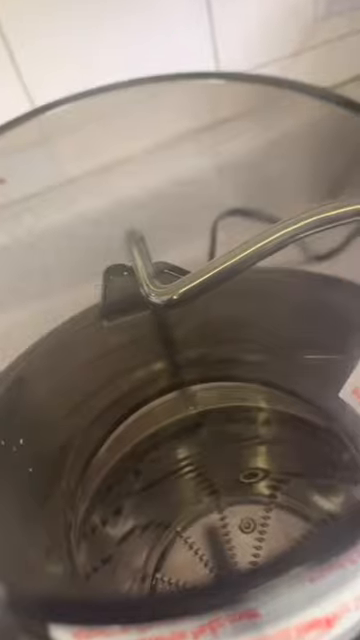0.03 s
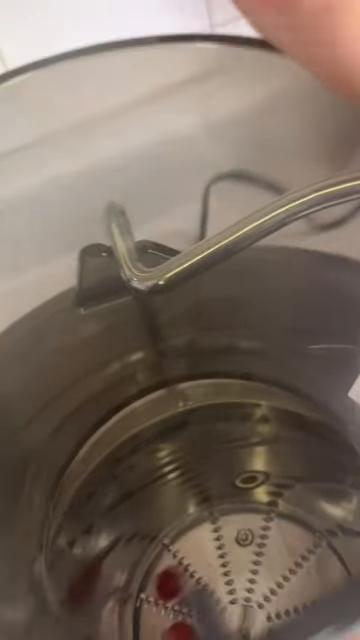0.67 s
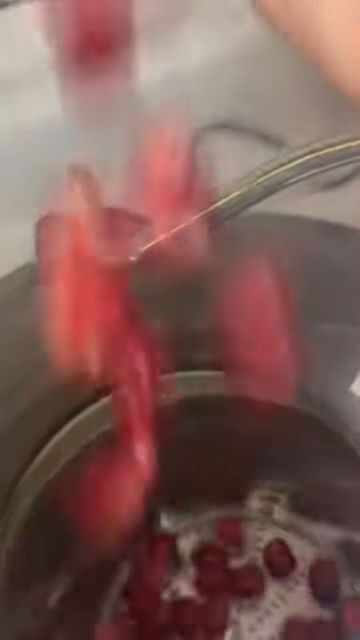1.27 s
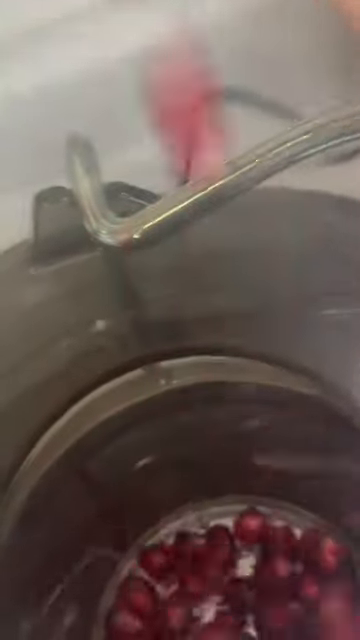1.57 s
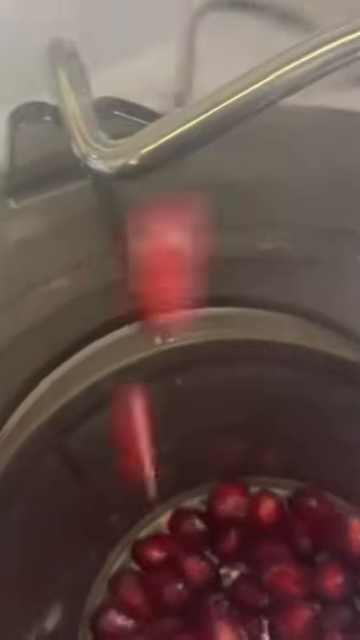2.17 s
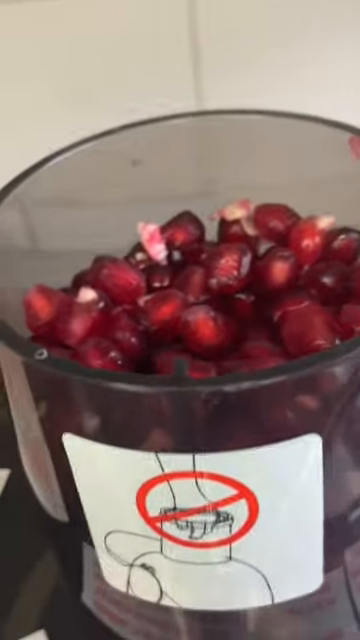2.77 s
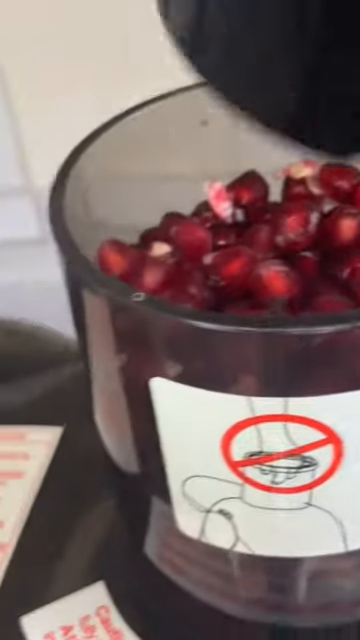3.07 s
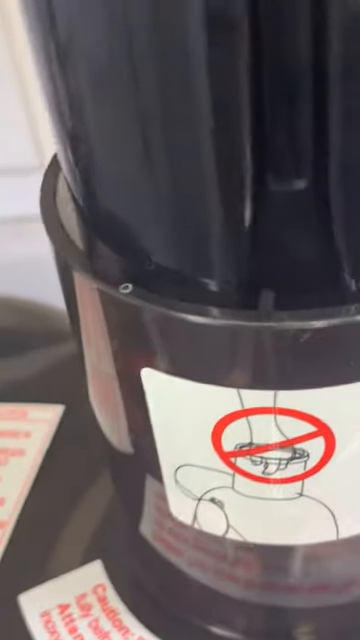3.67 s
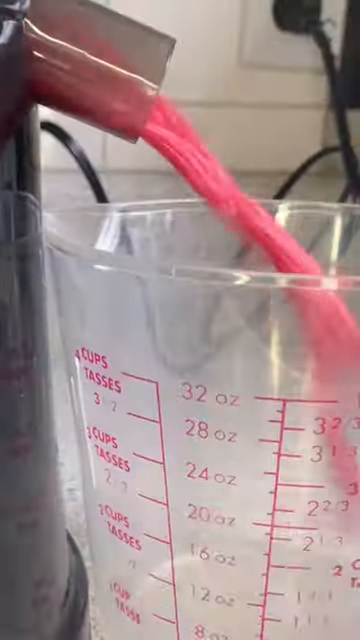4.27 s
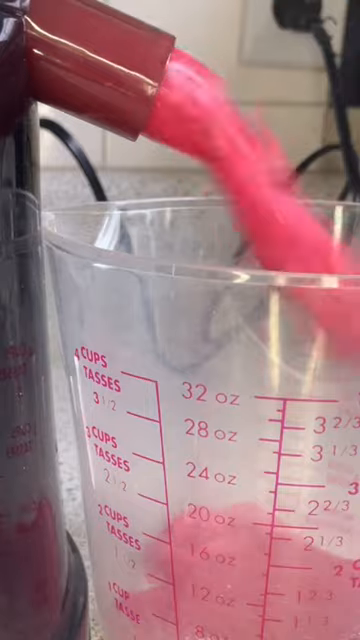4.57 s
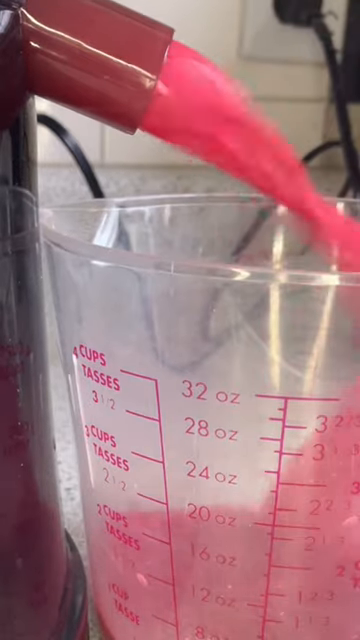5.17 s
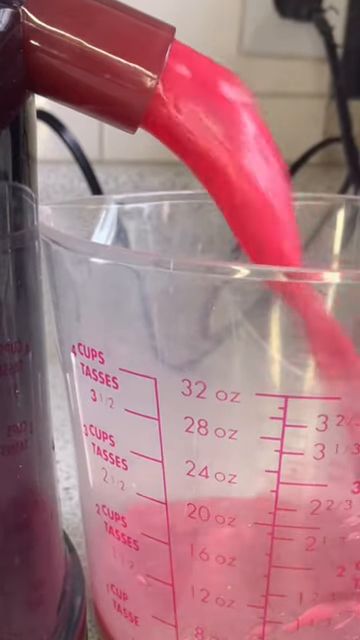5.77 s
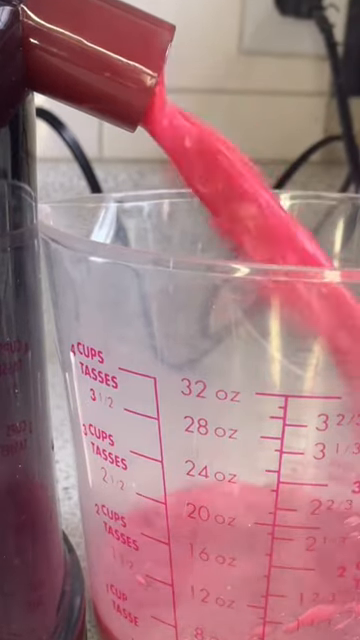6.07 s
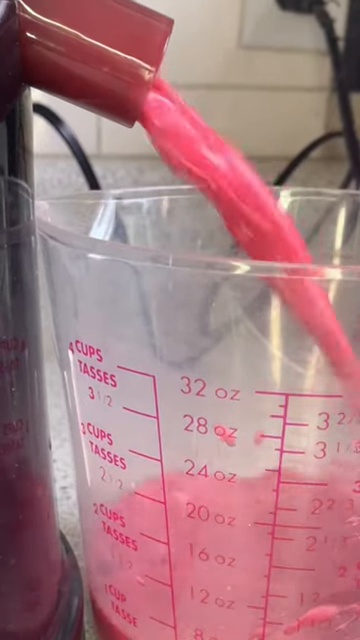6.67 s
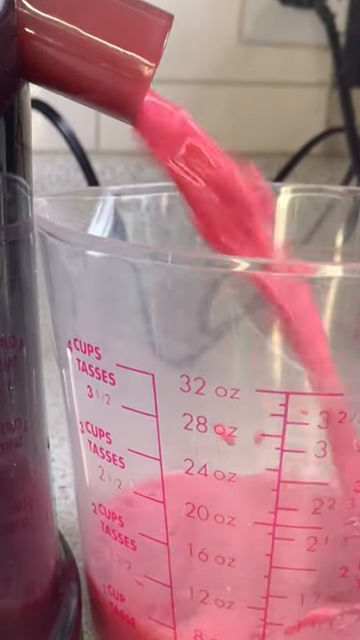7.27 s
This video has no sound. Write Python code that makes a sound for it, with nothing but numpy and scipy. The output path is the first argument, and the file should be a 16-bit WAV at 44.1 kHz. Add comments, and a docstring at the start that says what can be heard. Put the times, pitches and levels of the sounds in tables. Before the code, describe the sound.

Pomegranate seeds patter into a plastic chute, a pusher knocks, then an electric juicer shreds them with a roar and whines down as juice bubbles.

```python
"""Pomegranate seeds patter into a centrifugal juicer, each ringing the plastic chute with a wet tick.
The pusher knocks into place and slides down. Teeth shred the seeds with a roar over churning pulp.
The load clears, the motor speeds up, is switched off and coasts down, slots and commutator whining.
Air rushes through the basket, loose bits rattle in the bowl and juice bubbles into a jug.
The tiles of a small, quiet kitchen add short reflections."""
import sys
import numpy as np
from scipy import signal
from scipy.fft import rfft, irfft, next_fast_len
from scipy.io import wavfile
from scipy.ndimage import uniform_filter1d

SR = 44100
rng = np.random.default_rng(int(sys.argv[2]) if len(sys.argv) > 2 else 0)


def materialize(psi):
    """Save the field psi as 16-bit PCM at rate SR to the path in sys.argv[1].

    A 1-D psi becomes a single channel; in a 2-D psi each row is a channel.
    """
    bounded = np.clip(np.atleast_2d(psi).T, -1, 1)
    quanta = np.round(bounded * 32767).astype(np.int16)
    wavfile.write(sys.argv[1], SR, quanta)


N = 327222
TIME = np.arange(N) / SR

# big seeds cracking on the teeth: time_s, level_db
BIG_CRACKS = [(4.2537, -9), (4.2941, -25), (4.3081, -7.5), (4.315, -6), (4.3695, -8), (4.3948, -17),
              (4.4245, -7), (4.4458, -8.5), (4.4822, -10), (4.498, -6), (4.532, -8.5), (4.566, -6.5),
              (4.6275, -7.5), (4.7507, -9), (4.784, -9), (4.8917, -8.5)]
# teeth grating: freq_hz, gain_db
GRATE_SPECTRUM = [(300, -14), (600, -9), (950, 2), (1250, -1), (1800, -3), (2300, 0), (3800, -3),
                  (5000, -0.5), (7000, -3), (11000, 0.5), (15500, -7)]
# steel basket resonances: freq_hz, half_width_hz, gain_db
BASKET_MODES = [(1042, 66, -3.5), (2340, 230, -9.5), (3130, 385, 3), (4530, 71, 1.5)]
# churning pulp: freq_hz, gain_db
PULP_SPECTRUM = [(25, -34), (55, -7), (110, -3.5), (155, -5.5), (220, 3), (310, -5), (380, 3), (550, -1.5),
                 (850, -4.5), (1300, -14.5), (2500, -16), (5000, -39)]

# mains buzz: mains_multiple, level_db
BUZZ_HARMONICS = [(1, -51), (2, -39), (3, -53), (4, -43), (5, -54), (6, -48), (7, -59), (8, -52)]
# shaft imbalance and fan: shaft_multiple, level_db
SHAFT_HARMONICS = [(1, -49), (2, -54), (3, -52.5), (11, -62), (18, -77), (24, -62.5)]
# base and counter radiating the shaft hum: freq_hz, gain_db
BASE_RESPONSE = [(80, -2), (125, -3), (165, -34), (205, -3), (245, -2), (295, 3), (325, -4.5), (380, -32),
                 (700, 5), (1050, -1), (1350, -3), (1700, -17), (2250, 4), (2500, -7), (3000, 3)]
# armature slot tones: slot_rate_multiple, level_db
SLOT_HARMONICS = [(2, -15), (3, 1), (4, 2), (5, -16), (6, -2), (7, -15), (8, -2.5), (9, -17), (10, -6.5),
                  (11, -24), (12, -6), (13, -10), (14, -4), (16, -13)]
# housing radiating the whine: freq_hz, gain_db
HOUSING_RESPONSE = [(3000, -16), (3900, -8.5), (4600, -4), (5300, -8.5), (5750, -3.5), (6050, 15.5),
                    (6450, 4), (7100, 2.5), (8000, -6), (9300, 3), (10400, 9), (11500, 16), (12400, 13.5),
                    (13200, -1), (14600, -11), (15500, -9)]
# motor whine: time_s, gain_db
WHINE_ENVELOPE = [(5.1, -68), (5.3, -54), (5.62, -55.5), (6, -52.5), (6.7, -55.5), (7.2, -52.5),
                  (7.42, -55.5)]

# seeds landing one by one: start_s, wall_db, thud_db, tick_db
SEED_HITS = [(0.6544, -42.5, -37.5, -49), (0.7023, -33, -36, -43.5), (0.7587, -40, -38.5, -61),
             (0.8195, -39, -43, -69), (0.844, -35, -40.5, -52.5), (0.8964, -17.5, -25.5, -40),
             (0.9024, -27.5, -28.5, -46), (0.9144, -43, -40, -58), (0.9435, -36, -41, -42.5),
             (0.9564, -35, -33.5, -54), (0.9752, -20.5, -32.5, -35.5), (0.9974, -29, -29, -63),
             (1.0086, -25, -35, -39.5), (1.056, -34, -33, -49), (1.0799, -20, -40, -52),
             (1.0944, -34, -31, -40), (1.1179, -23, -32, -60), (1.1314, -36, -42, -40),
             (1.1443, -25.5, -31, -50), (1.1725, -23, -30.5, -36), (1.1915, -35, -33, -42),
             (1.2037, -29, -37, -50), (1.2194, -29, -32, -51), (1.2446, -40, -29.5, -58),
             (1.264, -41, -36, -43.5), (1.2775, -41, -37, -43), (1.288, -27, -32.5, -55),
             (1.3024, -53, -47, -70), (1.3259, -43, -37, -41.5), (1.3423, -31, -29, -50),
             (1.3694, -37, -36, -39), (1.3902, -24, -32, -44), (1.4122, -39, -33.5, -44),
             (1.4294, -31, -32.5, -40), (1.4476, -24, -30.5, -49), (1.4564, -28, -34, -42.5),
             (1.476, -29, -35, -44), (1.5419, -28, -47, -50), (1.5524, -35, -33, -38.5),
             (1.5644, -38, -32.5, -43), (1.5828, -36, -29.5, -46), (1.5934, -32, -30.5, -43),
             (1.6417, -25.5, -31.5, -42.5), (1.7015, -40, -42, -44.5), (1.7205, -32, -30, -52),
             (1.7695, -40, -33, -50), (1.8672, -35, -31, -52.5), (1.9634, -29.5, -37, -56),
             (1.9864, -36, -34, -50.5), (2.2524, -57, -35.5, -59)]
# six hollow chute modes, then nine of wall and basket: freq_hz, gain_db, t60_s
CHUTE_MODES = [(181, -6.5, 0.05), (418.4, -4.5, .09), (449, -6.5, 0.086), (540, -22, 0.13),
               (662.6, -1.5, 0.096), (766, -14.5, 0.044), (848, -15, 0.036), (1080, -6.5, 0.023),
               (1336, -8.5, 0.025), (1477, -13, 0.024), (1716, -5, 0.018), (2450, -15, 0.0095),
               (3080, -9.5, 0.0084), (4200, -15.5, 0.019), (6800, -12, .0044)]
# snap of a seed's skin: freq_hz, gain_db
TICK_SPECTRUM = [(300, -34), (1500, -18), (2500, 10), (5500, 4), (6800, 8), (8200, 5), (11000, 9.5),
                 (15500, 5)]

# plastic parts knocking: start_s, boom_db, clunk_db, clack_db, snap_db
KNOCK_HITS = [(2.152, -56, -61, -40, -20), (2.87, -84, -77, -57, -46), (3.155, -20.5, -8, -40, -24.5),
              (3.264, -38, -34, -39.5, -42.5), (3.283, -56, -56, -39.5, -38.5),
              (3.2891, -39, -40, -33.5, -15.5), (3.2907, -20.5, -17, -17, -16.5),
              (3.487, -37, -43, -37.5, -40.5), (3.711, -75, -77, -65, -42.5), (3.72, -72, -72, -60, -45),
              (3.804, -71, -74, -53, -36)]
# boom of the base: freq_hz, gain_db, t60_s
BOOM_MODES = [(58, -8.5, .09), (110, 3, 0.066), (227.5, -1, .066), (363, -2.5, .065)]
# pusher on the chute rim: freq_hz, gain_db, t60_s
CLUNK_MODES = [(454, -12.5, 0.045), (546, 8, 0.0087), (610, -16.5, 0.077)]
# clack of the feed tube: freq_hz, gain_db, t60_s
CLACK_MODES = [(1025, -7.5, 0.054), (1210, -7, 0.023), (1567, 2, 0.047), (1680, -6, 0.017),
               (2335, -5, 0.022), (2830, -10, .03), (2860, -6, 0.034), (4520, -11, .014), (4920, -10, .01),
               (6470, -11, 0.011), (7000, -15.5, 0.012)]
# sharp edge of a knock: freq_hz, gain_db
SNAP_SPECTRUM = [(300, -2), (1200, -18.5), (3000, 2.5), (4800, -5), (6000, -5.5), (7200, -8), (9500, -8),
                 (12500, -12.5), (15500, -24)]
# loose parts after a knock: freq_hz, gain_db
CHATTER_SPECTRUM = [(100, -5.5), (220, 3), (330, 1), (600, -1.5), (900, 4.5), (1700, -5.5), (3000, -10),
                    (6000, -26), (15500, -52.5)]
# pusher sliding on the chute wall: time_s, level_db
SLIDE_ENVELOPE = [(3.3, -82), (3.45, -70), (3.66, -75.5), (3.78, -66), (3.85, -56.5), (3.93, -69),
                  (4.05, -98)]
# faint high rustle: time_s, level_db
RUSTLE_ENVELOPE = [(2.4, -80), (2.55, -65.5), (2.72, -63), (2.86, -67.5), (3.05, -83)]

# air through the basket: freq_hz, gain_db
AIR_SPECTRUM = [(25, -30), (50, -6), (90, -2), (160, -5), (250, 9), (400, 1), (600, -0.5), (970, 1),
                (1060, 9), (1180, -3), (1360, -10), (1650, 5), (1880, -1), (2020, 5), (2200, -6.5),
                (3200, -7.5), (7000, -11)]
# fine spray off the sieve: freq_hz, gain_db
SPRAY_SPECTRUM = [(3000, -30), (6500, -13), (8500, -22), (10000, 3), (11200, -16), (12400, -15),
                  (13500, -20), (15500, -13)]
# air and spray: time_s, level_db
AIR_ENVELOPE = [(4.17, -51), (4.4, -51), (5.3, -44.5), (5.62, -39.5), (5.8, -41), (6.2, -43), (6.8, -44),
                (7.42, -47)]
# bowl resonances during the run-up: centre_s, width_s, pitch_hz, level_db
BOWL_SWELLS = [(5.314, 0.14, 1053, -37.5), (5.608, 0.1, 1614, -40.5)]
# big bubbles in the jug: start_s, level_db, pitch_hz
JUICE_PLOPS = [(6.549, -40, 607), (6.659, -37.5, 700), (6.963, -37.5, 615), (7.083, -39, 574),
               (7.26, -38, 544), (7.312, -31.5, 740)]
# bits and drops hitting the bowl: freq_hz, gain_db
RATTLE_SPECTRUM = [(300, -12), (700, -2), (1400, -5), (2000, 9), (3200, -4), (5000, 3), (8000, -36),
                   (15500, 2)]

# quiet kitchen: freq_hz, gain_db
ROOM_SPECTRUM = [(25, -9.5), (60, -3.5), (110, -12), (150, -5.5), (184, 5.5), (240, -10), (500, -16.5),
                 (800, -14.5), (1300, -22.5), (2200, -28.5), (4000, -41), (7000, -50), (15500, -56.5)]
# thin whine in the room: pitch_hz, level_db
ROOM_WHINE = [(5426, -88)]
# left-right likeness of diffuse noise: freq_hz, correlation
STEREO_CORRELATION = [(60, 0.67), (290, 0.54), (640, 0.43), (1400, 0.25), (3100, 0.085), (7000, -0.25),
                      (15000, -0.53)]
# stretches of sound between brief dips to silence: start_s, end_s, room_db
SPANS = [(0, 2.286, -46.5), (2.306, 4.12, -49.5), (4.163, 7.55, -61)]
# two dips in the overall treble: freq_hz, gain_db
TREBLE_DIPS = [(7500, 0), (8000, -1), (8550, -25.5), (9200, -1), (12400, 0), (12900, -7), (13600, -5.5),
               (14500, 1.5)]

ON_S, CLEAR_S, OFF_S = 4.165, 5.188, 5.622  # power on, seeds used up, power off
MAINS_HZ, SLOTS, BARS = 60, 12, 24


def shredding(turns):
    """Cracking seeds, scattered into a roar by the spinning disc, ring the steel basket."""
    cracks = teeth(turns)
    pole = np.exp(-1 / (0.012 * SR))  # 12 ms power follower
    roar = rng.standard_normal((3, N)) * np.sqrt(signal.lfilter([1 - pole], [1, -pole], cracks ** 2))
    direct = from_left(cracks + amp(-8.5) * roar[:1])
    diffuse = amp(1.5) * roar[1:]
    frames = signal.stft(direct + diffuse, SR, nperseg=256)[2]
    # each seed breaks with its own colour
    patches = uniform_filter1d(rng.standard_normal(frames.shape[1:]), size=6, axis=0)
    patches = unit_rms(uniform_filter1d(patches, size=4, axis=1))
    grate = signal.istft(frames * amp(1.9 * patches), SR, nperseg=256)[1][:, :N]
    hz = np.fft.rfftfreq(N, 1 / SR)
    basket = 1 + sum(amp(db) / (1 + 2j * (hz - mode_hz) / width) for mode_hz, width, db in BASKET_MODES)
    return kitchen(colour(irfft(rfft(grate) * basket, N), GRATE_SPECTRUM), wet_db=-15, t60_s=0.2)


def teeth(turns, grains_per_s=8000, small_cracks_per_s=16, push_s=4.494, push_db=4.5):
    """Teeth tear seeds in clumps of tiny cracks, louder under one firm push; bigger cracks stand out."""
    clumps = amp(2.1 * wander(210) + 0.28 * wander(51)) * (1 + 0.062 * np.cos(2 * np.pi * turns))
    grains = rng.choice([-1, 1], N) * (rng.random(N) < grains_per_s / SR)
    sizes = amp(5.6 * np.minimum(rng.exponential(1, N), 4))
    push = np.exp(-((TIME - push_s) / 0.18) ** 2)
    load = held(ON_S, CLEAR_S, rise_s=0.025, release_s=0.0036) * amp(-31 + push_db * push)
    cracks = unit_rms(grains * sizes * clumps) * load
    small = (rng.random(N) < small_cracks_per_s / SR) * load * amp(11)
    cracks += signal.oaconvolve(small, burst(decay_s=0.00057))[:N]
    for time_s, db in BIG_CRACKS:
        add(cracks, time_s, amp(db) * burst(decay_s=0.00077))
    return cracks


def pulp(rise_s=0.043, drain_s=0.047):
    """Pulp rumbles in the basket and drains as the seeds run out; dregs stay until power off."""
    bulk = amp(-37.5) * held(ON_S, CLEAR_S, rise_s, drain_s)
    dregs = amp(-42.5) * held(ON_S, OFF_S, rise_s, drain_s)
    return hiss(PULP_SPECTRUM) * (bulk + dregs) * amp(2.46 * wander(27))


def shaft_speed_hz(loaded_hz=70, free_hz=211, run_up_s=0.8, drag_s=4.42, friction_hz_per_s=4.82):
    """Held down by the load, rising towards free_hz once clear, then braked by air and bearings."""
    unloaded_s = np.clip(TIME, CLEAR_S, OFF_S) - CLEAR_S
    driven_hz = free_hz + (loaded_hz - free_hz) * np.exp(-unloaded_s / run_up_s)
    braking_hz = friction_hz_per_s * drag_s
    return (driven_hz + braking_hz) * np.exp(-np.maximum(TIME - OFF_S, 0) / drag_s) - braking_hz


def motor(turns):
    """Buzz and hum, slightly to the right, under the whine."""
    return (mains_buzz() + shaft_hum(turns)) * amp([[-.7], [.7]]) + whine(turns)


def mains_buzz():
    """Mains harmonics sound while the power is on."""
    buzz = np.zeros(N)
    for multiple, db in BUZZ_HARMONICS:
        gain = amp(db + 0.5) * (1 + 0.28 * wander(0.7))
        cycles = round(multiple) * MAINS_HZ * TIME + rng.random() + 0.15 * wander(8.3)
        buzz += gain * np.sin(2 * np.pi * cycles)
    return buzz * held(ON_S, OFF_S, rise_s=0.028, release_s=0.0074)


def shaft_hum(turns):
    """Imbalance and fan hum through base and counter, fading in as the load clears."""
    speed_hz = np.gradient(turns) * SR
    wobbly_turns = turns + 0.025 * wander(16.2)  # wet pulp unsettles the basket
    hum = np.zeros(N)
    for multiple, db in SHAFT_HARMONICS:
        gain = amp(db + 2 + value_at(BASE_RESPONSE, multiple * speed_hz) + 1.7 * wander(28))
        hum += gain * np.sin(2 * np.pi * (round(multiple) * wobbly_turns + rng.random()))
    return hum * np.interp(TIME, [5.1, 5.5], [0, 1])


def whine(turns):
    """Slot tones and a puff of brush hiss at every bar, radiated by the housing."""
    shaky_turns = turns + 0.00023 * wander(90) + 0.0022 * wander(29)  # brush chatter
    tones = commutator(shaky_turns) * amp(2.7 * wander(3.9) + 0.77 * wander(45))
    brushes = amp(-11) * rng.standard_normal(N) * (1 + np.cos(2 * np.pi * BARS * shaky_turns))
    radiated = colour(tones + brushes, HOUSING_RESPONSE) * envelope(WHINE_ENVELOPE)
    return kitchen(radiated, wet_db=5.5, t60_s=0.23)


def commutator(turns, comb_db=-22.5, fall_db_per_order=4, count=200, size=8192):
    """Brushes cross the same uneven bars each turn: slot tones, side tones, a comb of shaft multiples."""
    order = np.arange(count)
    tones, side_power = np.zeros(count), np.full(count, amp(comb_db) ** 2)
    for multiple, db in SLOT_HARMONICS:
        centre = SLOTS * round(multiple)
        tones[centre] = amp(db)
        side_power += amp(db - 3.5 - fall_db_per_order * (abs(order - centre) + 1.5)) ** 2
    lines = np.where(tones > 0, tones, np.sqrt(side_power) * amp(3 * rng.standard_normal(count)))
    one_turn = irfft(lines * (order > 0) * np.exp(2j * np.pi * rng.random(count)), size) * size / 2
    return np.interp(turns % 1, np.arange(size) / size, one_turn)


def seeds(bounce_s=(.005, .018), bounce_db=-8.5):
    """Each soft seed squashes with a wet tick, rings the hollow chute and bounces once."""
    thuds, ticks = np.zeros((2, N)), np.zeros(N)
    for start_s, wall_db, thud_db, tick_db in [*SEED_HITS, *handful()]:
        for hit_s, loss_db in [(start_s, 0), (start_s + rng.uniform(*bounce_s), bounce_db)]:
            hollow = ring(CHUTE_MODES[:6], scatter_db=2.5, detune=.022, attack_s=.0015, size=5000)
            wall = ring(CHUTE_MODES[6:], scatter_db=3.5, detune=.018, attack_s=.002, size=2000)
            add(thuds, hit_s, amp(loss_db + thud_db) * hollow)
            add(thuds, hit_s, amp(loss_db + wall_db) * wall)
            add(ticks, hit_s, amp(loss_db + tick_db) * wet_tick())
    thuds = kitchen(thuds * amp([[1.1], [-1.1]]), wet_db=-1, t60_s=0.24)
    ticks = kitchen(from_left(colour(ticks, TICK_SPECTRUM)), wet_db=-4, t60_s=0.2)
    return thuds + amp(5.5) * ticks


def handful(mid_s=1.27, half_width_s=0.34, stream_per_s=70, strays_per_s=12, stray_db=-13):
    """Random rows like SEED_HITS: a stream that swells and thins, with softer strays around it."""
    stream = np.exp(-((TIME - mid_s) / half_width_s) ** 4)
    times_s = arrivals(stream_per_s * stream + strays_per_s * (TIME > .8) * (TIME < 2.1))
    force_db = stray_db * (1 - np.interp(times_s, TIME, stream))
    spread_db = 2.5 * rng.standard_normal((200, 3))[:len(times_s)]
    typical_db = np.array([-45.5, -40, -53.5])  # wall, thud, tick
    return np.column_stack([times_s, typical_db + force_db[:, None] + spread_db])


def wet_tick(decay_s=0.0017, middle_hz=9050, size=1500):
    """A seed's skin snaps with a squelch of random pitch."""
    pitch_hz = middle_hz * np.exp(0.485 * rng.uniform(-1.017, 1))
    carrier = np.cos(2 * np.pi * pitch_hz * np.arange(size) / SR)
    squelch = uniform_filter1d(burst(decay_s), size=10) * carrier
    return amp(-1.5) * burst(decay_s) + amp(11.5) * squelch


def pusher(base_lag_s=0.00466):
    """Plastic knocks on plastic; the heavy base booms just after and loose parts chatter."""
    body, snaps, chatter = np.zeros((2, N)), np.zeros(N), np.zeros(N)
    for start_s, boom_db, clunk_db, clack_db, snap_db in KNOCK_HITS:
        boom = ring(BOOM_MODES, scatter_db=2.0, detune=0.0066, attack_s=0.001)
        clunk = ring(CLUNK_MODES, scatter_db=0.0, detune=0.0041, attack_s=0.00098)
        clack = ring(CLACK_MODES, scatter_db=-0.5, detune=0.0056, attack_s=0.00044)
        add(body, start_s + base_lag_s, amp(boom_db) * boom)
        add(body, start_s, amp(clunk_db) * clunk + amp(clack_db) * clack)
        add(snaps, start_s, amp(snap_db) * burst(decay_s=0.0018))
        add(chatter, start_s, amp(max(clunk_db, clack_db) - 16.5) * burst(decay_s=0.014, size=5000))
    noise = colour(snaps, SNAP_SPECTRUM) + colour(chatter, CHATTER_SPECTRUM)
    return kitchen(body + from_left(noise), wet_db=-4.5, t60_s=0.41)


def sliding():
    """A faint high rustle, then the pusher rubs down the chute wall."""
    rub = hiss([(500, -20), (1500, 0.5), (4500, 4.0), (7000, -4.5), (9000, 0.5), (15500, -4.0)])
    rub *= envelope(SLIDE_ENVELOPE) * amp(3.1 * wander(90))
    rustle = hiss([(1500, -5.5), (3600, -8.0), (4200, -2), (5100, -2.5), (6000, -19), (12000, -25)])
    return (rub + rustle * envelope(RUSTLE_ENVELOPE)) * amp([[-1.5], [1.5]])


def bowl(turns):
    """Air and spray rush through the basket; the bowl sings briefly during the run-up."""
    rush = (hiss(AIR_SPECTRUM) + amp(-16) * hiss(SPRAY_SPECTRUM)) * envelope(AIR_ENVELOPE)
    rush *= amp(1.14 * wander(22)) * (1 + 0.1 * np.cos(2 * np.pi * turns))
    for centre_s, width_s, hz, db in BOWL_SWELLS:
        swell = np.exp(-(2 * (TIME - centre_s) / width_s) ** 2)
        band = [(hz * 0.92, -45), (hz * 0.94, -9), (hz, 0), (hz * 1.04, -9), (hz * 1.33, -45)]
        rush += amp(db) * swell * amp(1.6 * wander(45)) * hiss(band)
    return rush


def juice(from_s=5.9, bubbles_per_s=55, bubble_db=-49, bubble_hz=605):
    """Bubbles in the jug ring and rise slightly in pitch: a few plops over a fine gurgle."""
    jug, t = np.zeros((1, N)), np.arange(5000) / SR
    times_s = arrivals(bubbles_per_s * (TIME > from_s))
    gurgle = [(start_s, bubble_db + 3 * louder, bubble_hz * np.exp(0.257 * higher))
              for start_s, (louder, higher) in zip(times_s, rng.standard_normal((200, 2)))]
    for start_s, db, hz in JUICE_PLOPS + gurgle:
        chirp = np.sin(2 * np.pi * hz * t * (1 + 0.45 * t))
        add(jug, start_s, amp(db) * chirp * np.exp(-t / 0.0076) * (1 - np.exp(-t / 0.0002)))
    return kitchen(jug, wet_db=-4.5)


def rattle(turns, mean_per_s=500, spread_db=4.5):
    """With the seeds gone, bits and drops are flung at the bowl, most at one point of each turn."""
    per_s = mean_per_s * (TIME > CLEAR_S) * (1 + 0.6 * np.cos(2 * np.pi * turns))
    sizes = rng.choice([-1, 1], (2, N)) * amp(spread_db * np.minimum(rng.exponential(1, (2, N)), 4))
    bits = unit_rms(sizes * (rng.random((2, N)) < per_s / SR)) * amp(-61.5)
    return kitchen(colour(bits, RATTLE_SPECTRUM), wet_db=-5.5, t60_s=0.12)


def room_tone():
    """Low room noise, quieter in each span; a thin whine hangs in the first."""
    gain = sum(amp(db) * (TIME >= start_s) * (TIME < end_s) for start_s, end_s, db in SPANS)
    tone = sum(amp(db) * np.sqrt(2) * np.sin(2 * np.pi * hz * TIME) for hz, db in ROOM_WHINE)
    noise = hiss(ROOM_SPECTRUM) * gain * amp(.5 * wander(7.3)) * amp([[-1], [1]])
    return noise + tone * (TIME < SPANS[0][1])


def kitchen(x, wet_db, t60_s=0.19, size=20000):
    """Adds tile and counter reflections; the bass falls 60 dB in half of t60_s, the treble sooner."""
    t = np.arange(size) / SR
    taps = rng.standard_normal((2, size)) * (rng.random((2, size)) < .08)
    taps *= (t > .002) * (1 + 2.0 * np.exp(-t / 0.0031))  # strong early echoes
    hz, frame_s, frames = signal.stft(taps, SR, nperseg=256)
    decay = amp(-60 * frame_s / t60_s * (2.0 + hz[:, None] / 22000))
    tail = signal.istft(frames * decay, SR, nperseg=256)[1]
    tail /= np.linalg.norm(tail, axis=1, keepdims=True)
    return x + amp(wet_db) * signal.oaconvolve(x, tail, axes=1)[:, :N]


def ring(modes, scatter_db, detune, attack_s, size=10000):
    """One blow; the spot hit weights the modes, and higher ones differ more between the ears."""
    hz, db, t60_s = np.transpose(modes)[:, :, None]
    t = np.arange(size) / SR
    weight, shift, spread = rng.standard_normal((3, len(modes), 1))
    ear_phase = np.array([spread, -spread]) * np.minimum(hz / 1300, 1.5)
    polarity = np.pi * rng.integers(0, 2, (len(modes), 1))  # starts inward or outward
    waves = np.sin(2 * np.pi * hz * (1 + detune * shift) * t + ear_phase + polarity)
    return (amp(db + scatter_db * weight - 60 * t / t60_s) * waves).sum(1) * (1 - np.exp(-t / attack_s))


def burst(decay_s, size=1500):
    """Puff of noise that swells and dies."""
    t = np.arange(size) / SR
    return rng.standard_normal(size) * np.exp(-t / decay_s) * (1 - np.exp(-5.0 * t / decay_s))


def hiss(spectrum):
    """Diffuse stereo noise of unit rms, most alike in the bass."""
    size = next_fast_len(N, True)
    hz = np.fft.rfftfreq(size, 1 / SR)
    left, other = rfft(rng.standard_normal((2, size)))
    correlation = np.clip(value_at(STEREO_CORRELATION, hz), -1, 1)
    right = correlation * left + np.sqrt(1 - correlation ** 2) * other
    return unit_rms(irfft(np.array([left, right]) * amp(value_at(spectrum, hz)), size)[:, :N])


def colour(x, spectrum, size=4096):
    """Minimum-phase filter of unit energy."""
    log_gain = np.log(amp(value_at(spectrum, abs(np.fft.fftfreq(size, 1 / SR)))))
    taps = np.fft.ifft(np.exp(np.conj(signal.hilbert(log_gain)))).real[:size // 2]
    return signal.oaconvolve(np.atleast_2d(x), taps[None] / np.linalg.norm(taps), axes=1)[:, :x.shape[-1]]


def wander(rate_hz, size=2 ** 15):
    """Smooth random drift of unit rms, up to rate_hz."""
    hz = np.fft.rfftfreq(size, TIME[-1] / size)
    slow = irfft(rfft(rng.standard_normal(size)) / (1 + (hz / rate_hz) ** 4))
    return unit_rms(np.interp(TIME, np.linspace(0, TIME[-1], size), slow))


def arrivals(per_s):
    """Bunched random times that follow a rate curve."""
    expected = np.cumsum(per_s) / SR
    marks = np.arange(200) + 3 * rng.random(200)
    return np.interp(marks[marks < expected[-1]], expected, TIME)


def held(start_s, stop_s, rise_s, release_s):
    """Rise, hold, release."""
    rise = 1 - np.exp(-np.maximum(TIME - start_s, 0) / rise_s)
    return rise * np.exp(-np.maximum(TIME - stop_s, 0) / release_s)


def envelope(rows):
    """Gain from (time_s, level_db) rows; silent before them and from 40 ms after."""
    time_s, db = np.transpose(rows)
    sounding = (TIME >= time_s[0]) & (TIME <= time_s[-1] + .04)
    return sounding * amp(np.interp(TIME, time_s, db))


def from_left(x, lag_samples=20):
    """Delays the right channel."""
    return np.array([x[0], np.roll(x[-1], lag_samples)])


def value_at(points, hz):
    """Interpolates on a log-frequency axis."""
    point_hz, value = np.transpose(points)
    return np.interp(np.log(hz + 1), np.log(point_hz + 1), value)


def add(mix, start_s, sound):
    """Mixes a sound in place."""
    part = mix[..., round(start_s * SR):][..., :sound.shape[-1]]
    part += sound[..., :part.shape[-1]]


def amp(db):
    """Decibels to gain."""
    return 10 ** (np.asarray(db) / 20)


def unit_rms(x):
    """Scales to an rms of one."""
    return x / np.sqrt(np.mean(x ** 2) + 1e-20)


def scene():
    """All sources over the quiet kitchen; one shaft angle drives the spinning parts."""
    turns = np.cumsum(shaft_speed_hz()) / SR
    return (room_tone() + pusher() + sliding() + motor(turns) + bowl(turns) + rattle(turns)
            + juice() + shredding(turns) + pulp() + seeds())


def record(dry):
    """Low cut, two treble dips, a fade in and out of each span, band limit."""
    low_cut_hz, top_hz, fade_in_s, fade_out_s = 42, 16050, 0.13, 0.079
    thinned = signal.sosfilt(signal.butter(3, low_cut_hz, "high", fs=SR, output="sos"), dry)
    notched = irfft(rfft(thinned) * amp(value_at(TREBLE_DIPS, np.fft.rfftfreq(N, 1 / SR))), N)
    fades = np.zeros(N)
    for start_s, end_s, _ in SPANS:
        fade_in = np.clip((TIME - start_s) / fade_in_s, 0, 1) ** 1.35
        fades += fade_in * np.clip((end_s - TIME) / fade_out_s, 0, 1)
    lowpass = signal.firwin(401, top_hz, window=("kaiser", 8), fs=SR)
    return signal.oaconvolve(notched * fades, lowpass[None], "same")


dry = scene()
out = record(dry)
materialize(out)
```